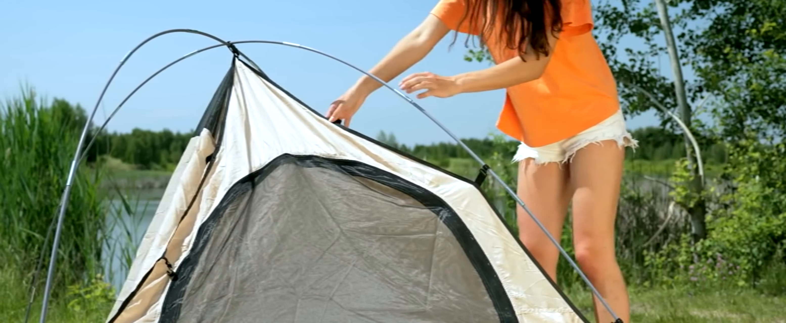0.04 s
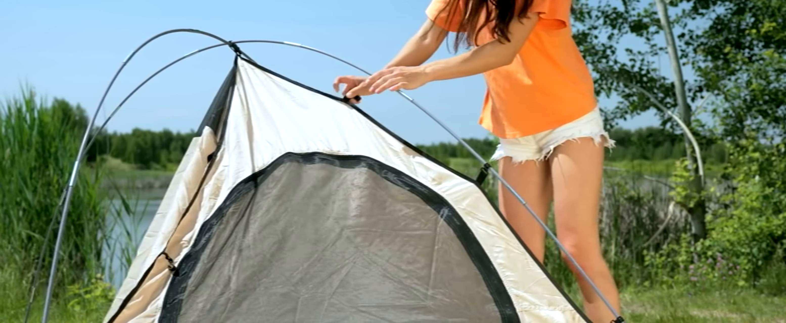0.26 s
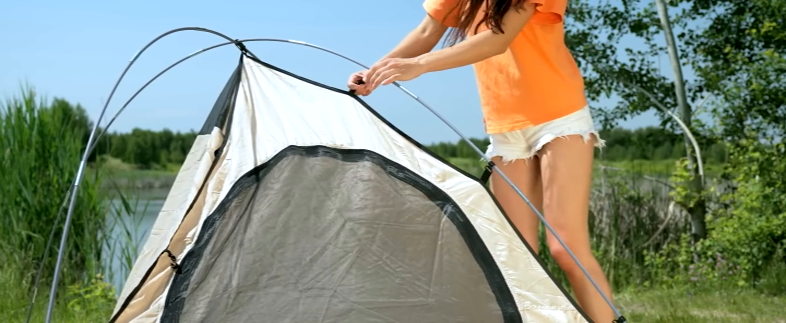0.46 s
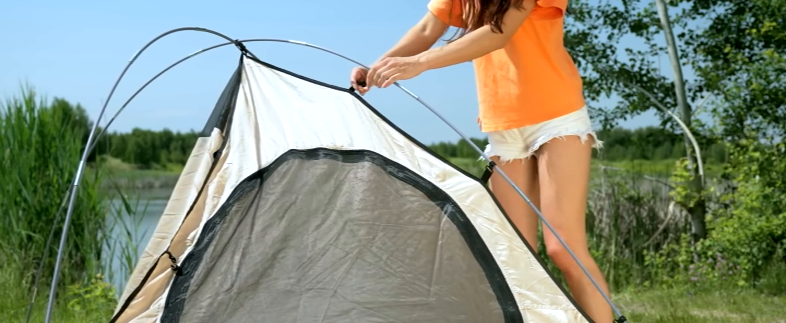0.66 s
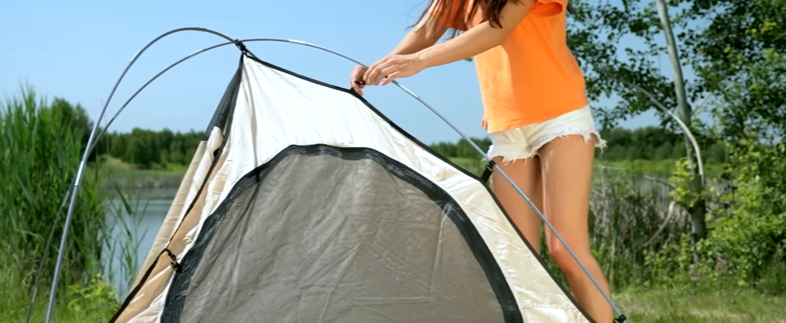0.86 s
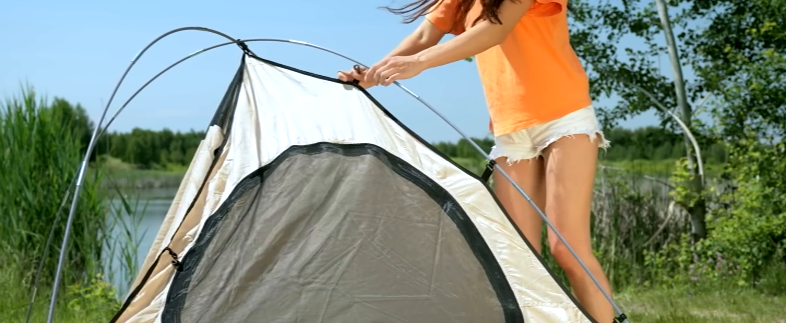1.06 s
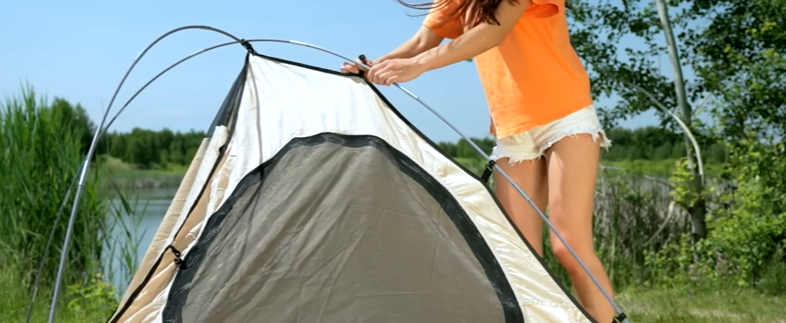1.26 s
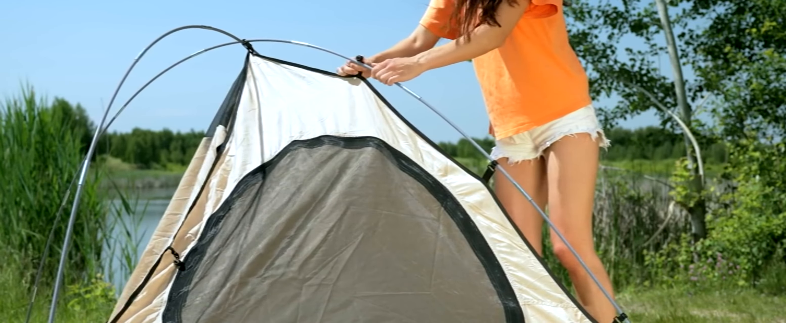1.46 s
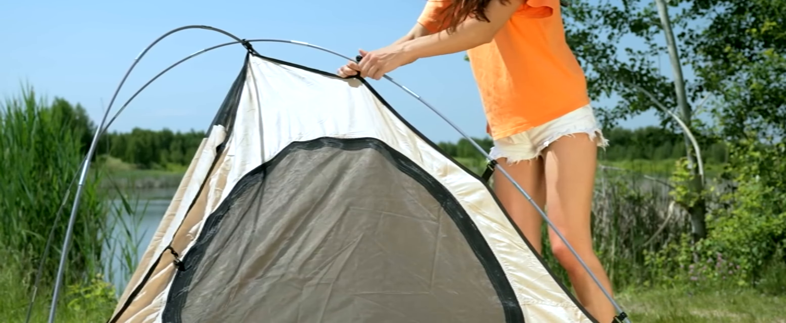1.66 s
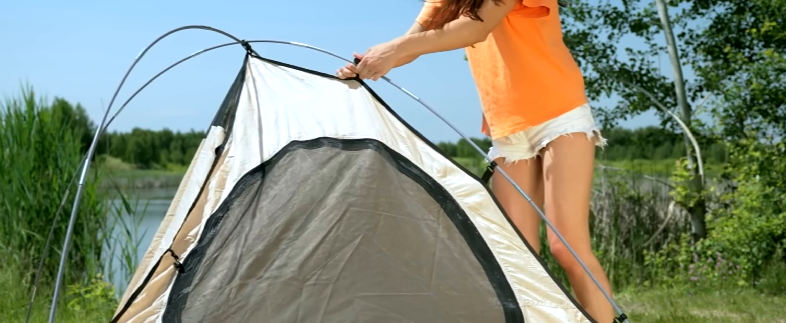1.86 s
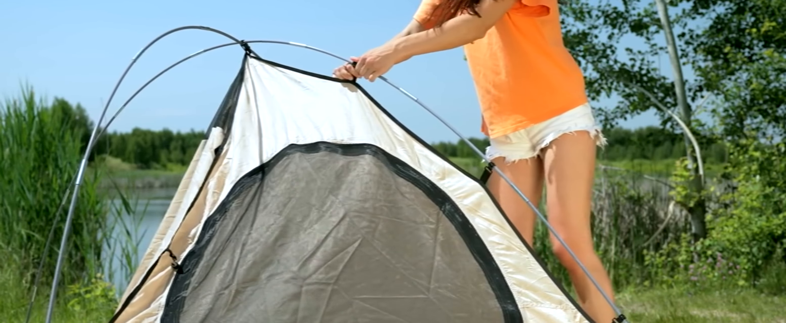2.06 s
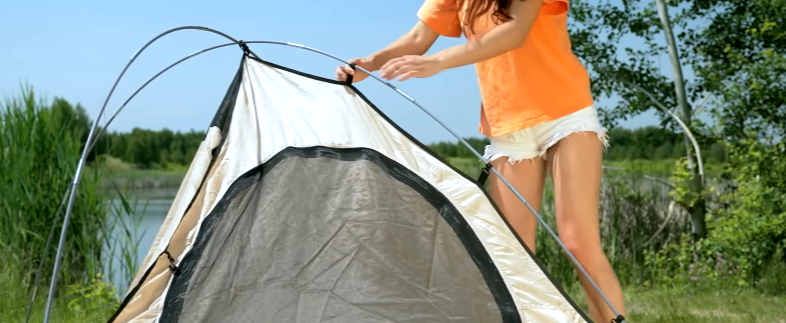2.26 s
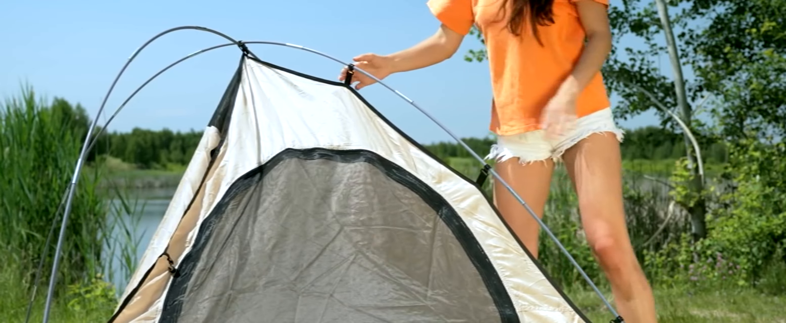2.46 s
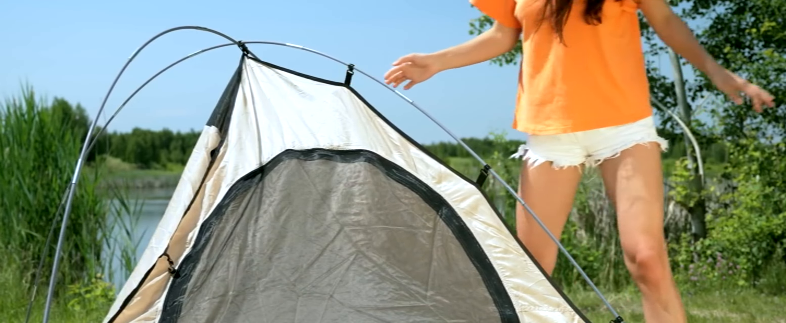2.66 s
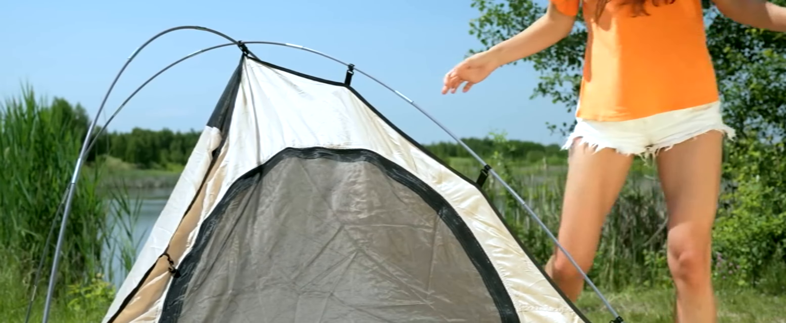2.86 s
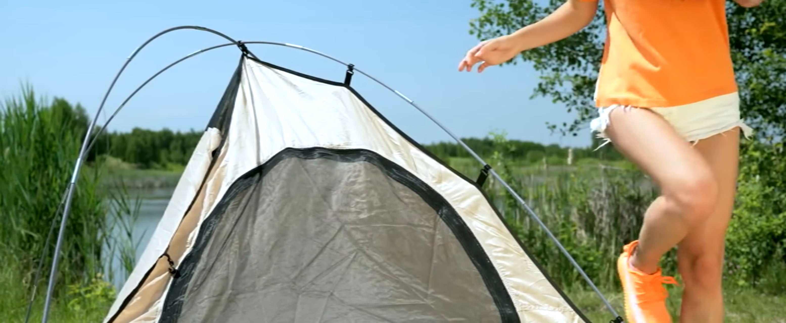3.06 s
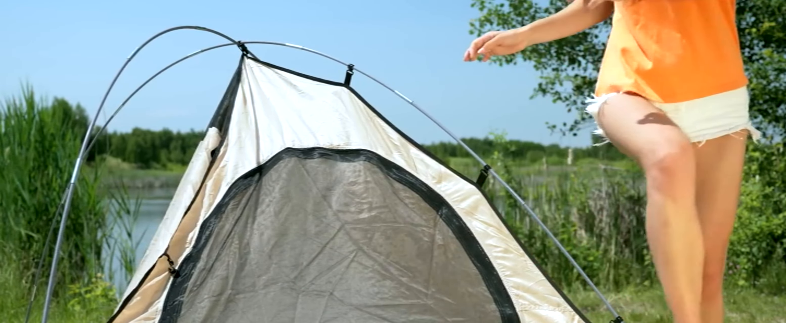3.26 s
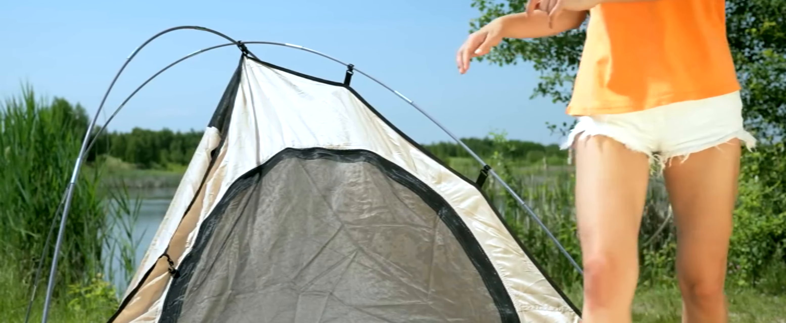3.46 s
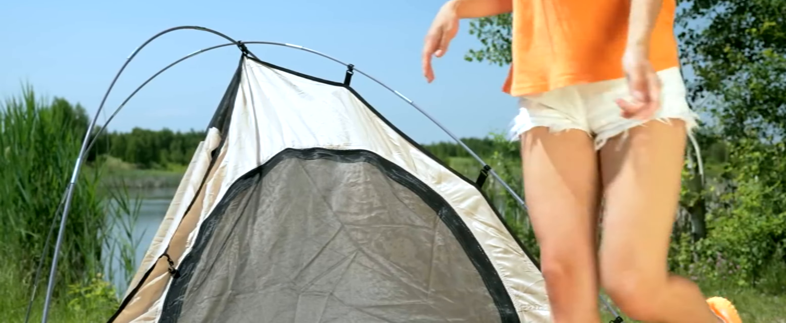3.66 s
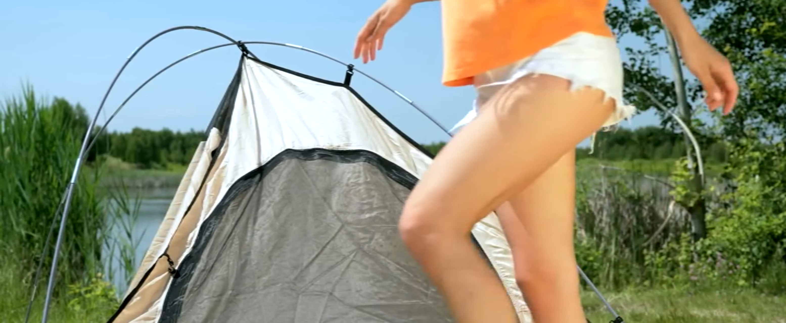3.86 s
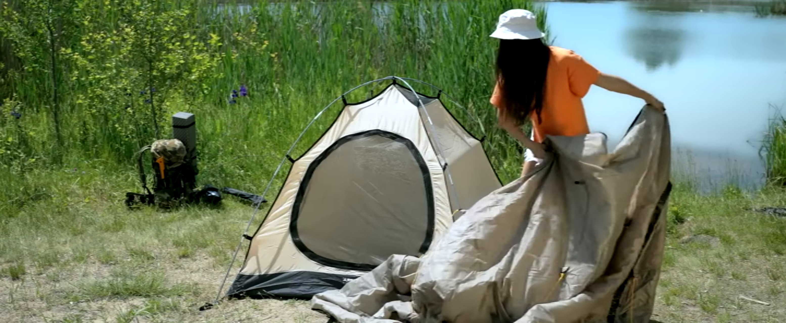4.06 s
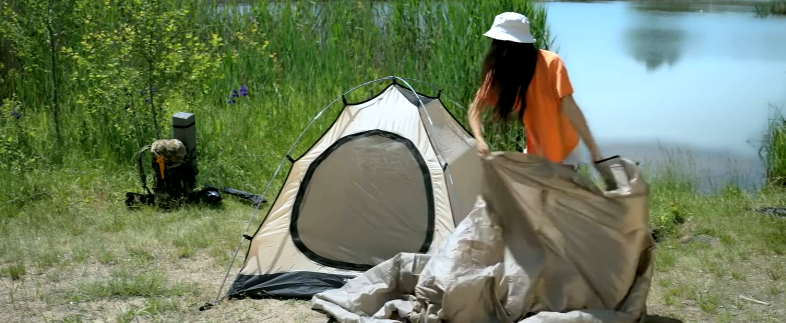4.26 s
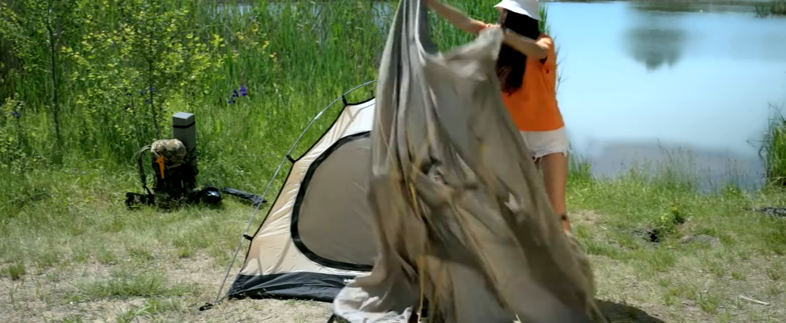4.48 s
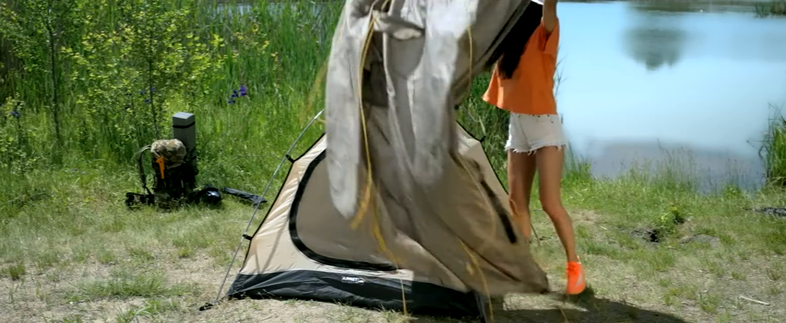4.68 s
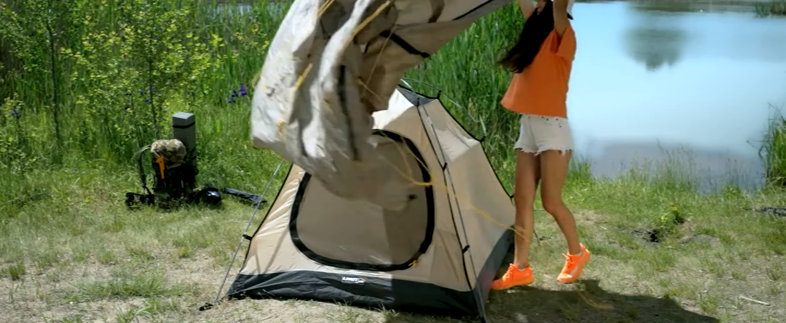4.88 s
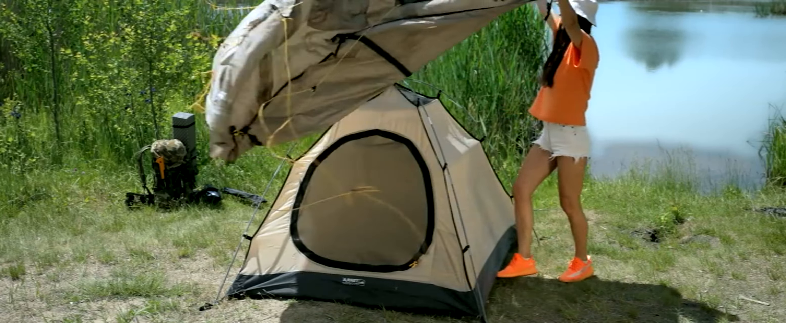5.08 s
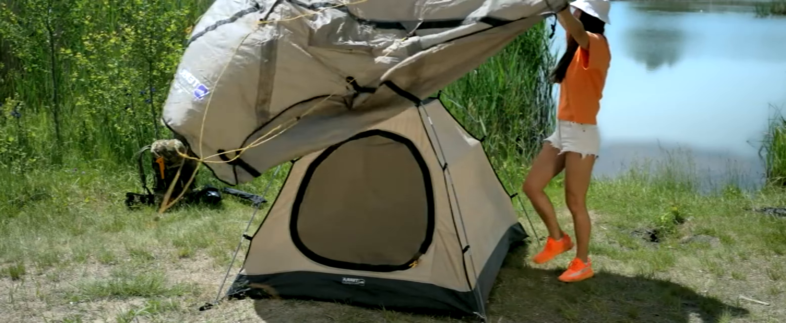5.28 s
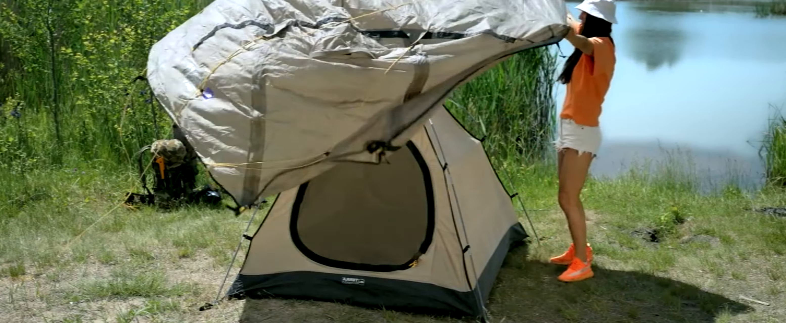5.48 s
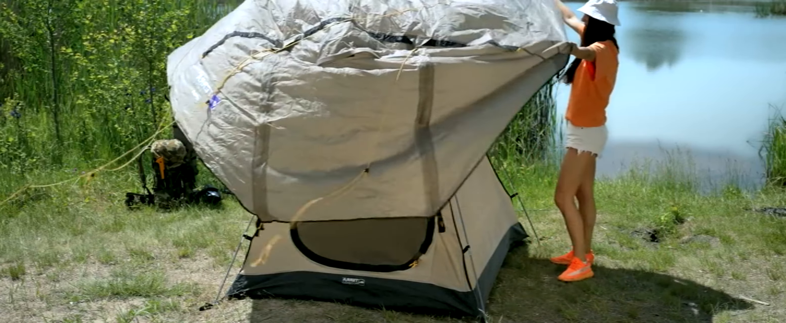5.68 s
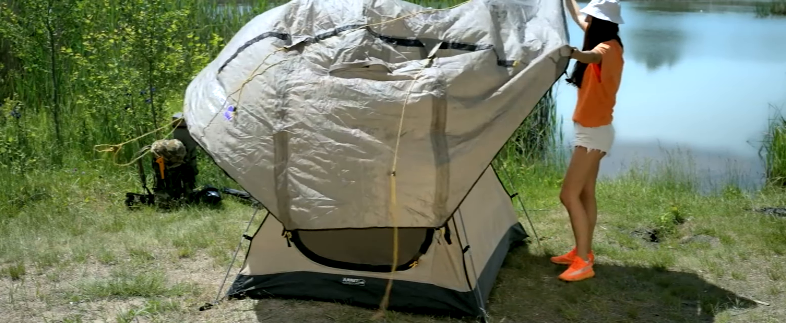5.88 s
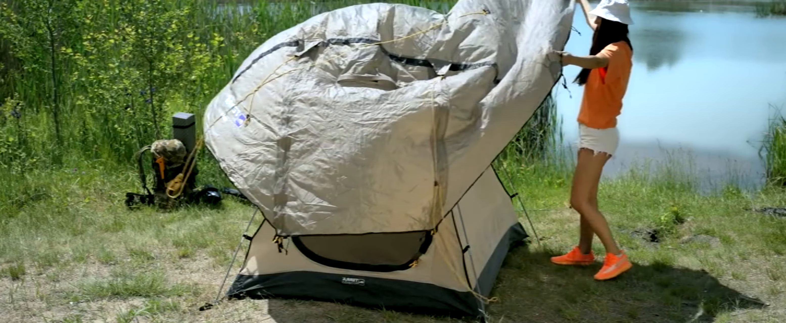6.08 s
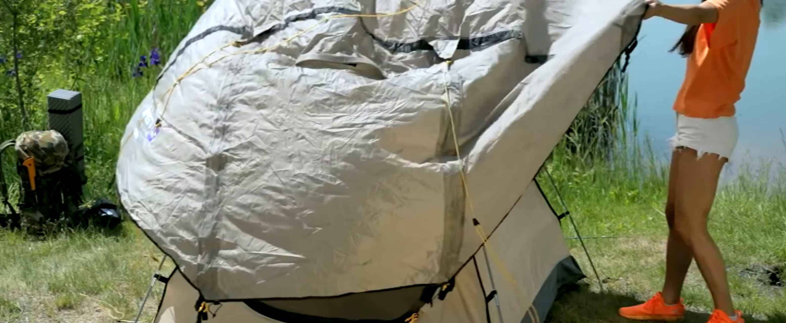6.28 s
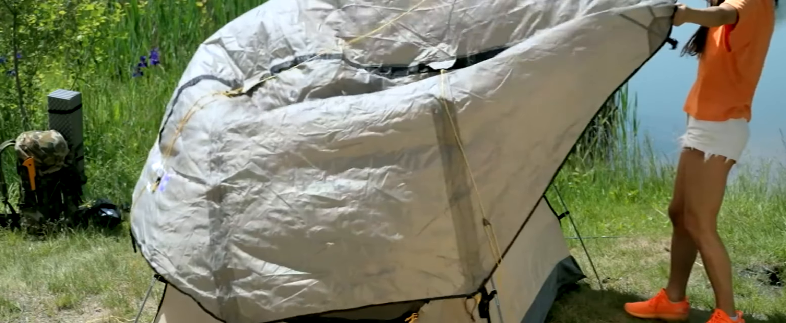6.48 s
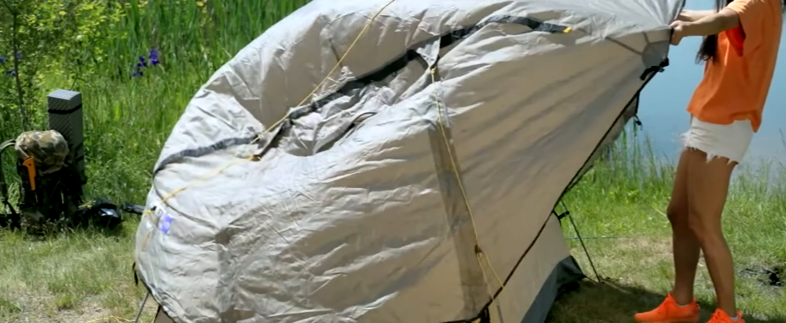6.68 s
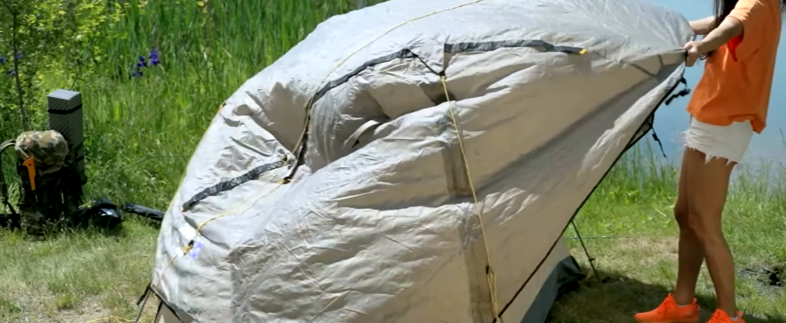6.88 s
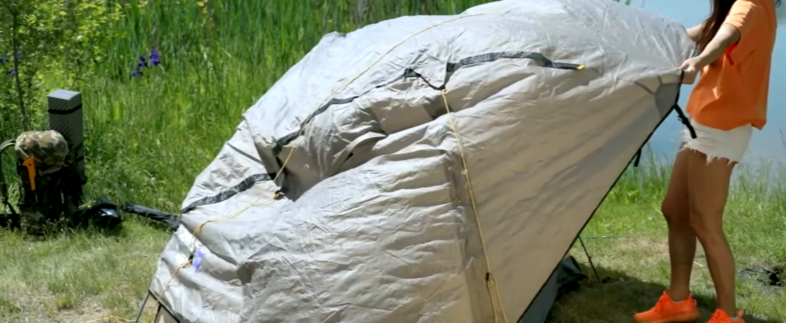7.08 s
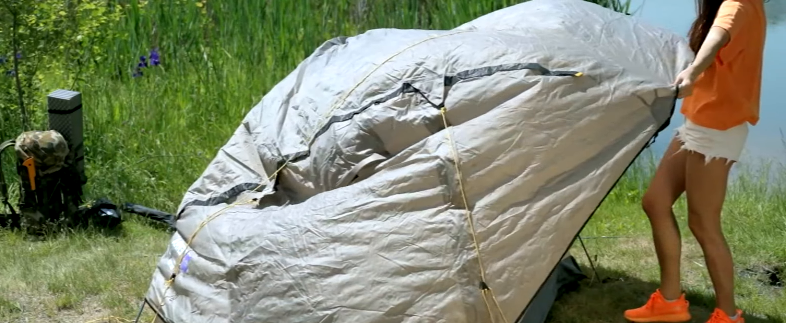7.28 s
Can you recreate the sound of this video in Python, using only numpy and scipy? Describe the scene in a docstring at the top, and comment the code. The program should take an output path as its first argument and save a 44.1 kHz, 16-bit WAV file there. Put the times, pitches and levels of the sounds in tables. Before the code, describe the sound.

A soft breeze with low rumble and faint reed hiss runs throughout, with a very faint grass brush near 0.3 s. At 1.4 s light plastic ticks sound with a short bird rasp; more rasps follow around 1.8 and 2.0 s, alongside a brighter tick and dull knock at 1.96. From 2.44 to 2.6 s the bird gives quick rasps and two falling whistles, with a faint outdoor echo. Grass swishes at 2.9 and 3.5 s, and a very loud, dry plastic snap hits at 3.68. From 4.05 s nylon rustles, swelling to a loud crackling whoosh at 4.3-4.75 with sharp creases. Duller flaps follow at 4.8-4.9, then another, softer billowing surge at 5.2-5.5. Scattered rustles and small cracks around 5.7-6.7 dwindle to breeze, with a faint tick at 7.0 s. Close, dry, open air.

```python
"""A breeze blows in the reeds throughout, and a shoe brushes grass: both are noise coloured to suit.
Plastic hooks tick on tent poles and one snaps shut (short noise bursts and fading tones), while
a marsh bird rasps (pulsed noise) and whistles (pairs of gliding tones).
A nylon fly sheet is hauled up and swung over the dome: crackling noise with flaps and cracks.
Everything is heard twice, the quieter copy a few ms late."""
import sys
import numpy as np
from scipy import signal
from scipy.fft import rfft, irfft, next_fast_len
from scipy.io import wavfile
from scipy.ndimage import uniform_filter1d

SR = 44100
rng = np.random.default_rng(int(sys.argv[2]) if len(sys.argv) > 2 else 0)


def output_pcm(signal):
    """Save a mono or channel-first signal as 16-bit PCM at the path in sys.argv[1].

    Samples are clipped to [-1, 1] before scaling.
    """
    pcm = np.clip(np.atleast_2d(signal).T, -1, 1) * 32767
    wavfile.write(sys.argv[1], SR, np.round(pcm).astype(np.int16))


N = 323253  # length in samples

# Colour of the breeze: f/Hz, relative level/dB (per Hz)
BREEZE_COLOUR = [(12, -40), (26, -14), (60, -8.5), (100, 4.5), (150, -8), (250, -11), (500, -15.5),
                 (1000, -18.5), (2500, -16), (5500, -19), (9000, -28), (15200, -34.5), (16500, -47)]
# Gusts: t/s, rumble level/dB, reed hiss level/dB (both over their usual level)
GUSTS = [(0, -1, 0.8), (.8, -1.5, 0.7), (1.1, 3, 0.9), (1.45, -0.5, 0.7), (1.85, 1.5, 0.8),
         (2.15, 0.5, 0.7), (2.5, -0.5, 0.5), (3.2, -1, -0.4), (3.7, -2.5, 0.5), (5.5, 0.5, 2),
         (6.8, -1.5, -1), (7.33, -0.5, -4)]
BREEZE_DB = -55  # level before the gusts
DEEP_SWING = 2.1  # the deepest octaves follow the rumble more widely
RUMBLE_FLICKER_DB, HISS_FLICKER_DB = 0.8, 0.9

# Grass brushed by a shoe: loudest t/s, level/dB, swell t/s, dying t/s, airy top over that level/dB
BRUSHES = [(.304, -61, .25, 0.11, -3), (2.876, -50, 0.17, .045, -4), (2.95, -54, 0.16, 0.14, -12),
           (3.527, -45.5, 0.021, 0.13, -16), (3.618, -49.5, 0.068, .05, -20)]
# Colour of the grass: f/Hz, relative level/dB (per Hz)
GRASS_COLOUR = [(300, -4.5), (1500, 3), (4000, -1), (9000, -5), (15000, -19)]
BRUSH_DEPTH_DB = 30  # a brush swells from and dies to this far under its level
AIRY_HZ = 9500  # the airy top starts here

# Hooks ticking on the poles: t/s, peak level/dB, centre f/Hz, width f/Hz, rattle's 60 dB decay t/s
TICKS = [(1.405, -29, 7600, 5000, 0.021), (1.447, -31.5, 9900, 7000, 0.0095),
         (1.9550, -30, 8500, 9000, .03), (1.9578, -21, 8140, 7100, 0.022), (1.9592, -23, 5030, 1800, 0.019),
         (2.966, -32, 3920, 4000, 0.0036), (3.6866, -45, 6200, 2000, 0.016),
         (7.002, -35, 5300, 1800, 0.042), (7.0014, -40, 9000, 9000, .01)]
# Dull knocks through taut cloth and ground, one row per tone; the rows near 1.96 s are the
# tones of one blow: t/s, peak level/dB, centre f/Hz, 60 dB decay t/s
KNOCK_TONES = [(1.9559, -25, 1146, 0.025), (1.9575, -29, 695, 0.082), (1.958, -38, 487, 0.045),
               (1.970, -39, 322, 0.04), (1.985, -36.5, 156, 0.11), (3.5190, -31.5, 235, 0.034),
               (6.736, -36.5, 205, 0.035), (6.905, -41, 985, 0.12)]
# Ringing shell of the hook that springs shut: f/Hz, relative level/dB, 60 dB decay t/s
CATCH_MODES = [(2870, -4, 0.007), (3220, -1.5, 0.0044), (1720, -12, 0.0044), (4290, -7.5, 0.0056),
               (7430, -16, 0.0044)]
# Crack of that hook (one row): peak level/dB, centre f/Hz, width f/Hz, rattle after it level/dB
CATCH_CRACK = (-1, 8500, 10000, -20.5)
CATCH_S, CATCH_DB = 3.6767, -2.5  # start and peak of the shell's ring
PUSH_S, CRACK_LAG_S = 0.0008, 0.001  # the ring's soft start, and the wait before the crack

# Bird rasps; the weak short rows about 45 ms after a long rasp are its echo:
# t/s, length t/s, peak level/dB, centre f/Hz, width f/Hz
RASPS = [(1.438, 0.032, -32.5, 2670, 1240), (1.481, .012, -44, 2490, 700), (1.833, .034, -34, 2530, 1150),
         (1.878, 0.012, -39, 2420, 700), (2.001, 0.0039, -36, 2420, 700),
         (2.0074, 0.029, -27.5, 2660, 1220), (2.05, 0.0058, -39, 2600, 900), (2.443, .005, -36, 3330, 500),
         (2.453, 0.0095, -24.5, 3660, 1280), (2.454, 0.0074, -37, 2120, 800),
         (2.504, 0.0059, -27.5, 3380, 1790), (2.505, .0067, -42, 2000, 800), (2.535, .0069, -34, 3240, 500),
         (2.545, 0.01, -24.5, 3680, 1200), (2.547, .0092, -42, 2170, 700), (2.597, 0.0071, -33, 3000, 500)]
# Bird whistles, one list per note: t/s, upper partial f/Hz, its level/dB, lower partial level/dB
WHISTLES = [
    [(2.468, 3590, -42, -54), (2.482, 3405, -33.5, -53), (2.498, 3290, -31, -53), (2.508, 3280, -31, -48)],
    [(2.562, 3530, -39, -55), (2.584, 3336, -32, -52), (2.598, 3120, -36, -52), (2.608, 3000, -56, -65)],
]
# Scattered echo from far bank and trees (one row): lag t/s, 60 dB decay t/s, level/dB
BIRD_ECHO = (.02, .9, -17)
RASP_PULSES_HZ = 192

# Swing of the fly sheet: t/s, rustle level/dB, treble over the rustle level/dB
SHEET_SWING = [(4.05, -81, -4), (4.09, -45, -5), (4.2, -47, -8), (4.28, -43.5, -10), (4.33, -35.5, -10.5),
               (4.39, -30, -9.5), (4.45, -30, -6), (4.5, -26.5, -8), (4.6, -29, -6), (4.73, -30, -9.5),
               (4.755, -40.5, -4.5), (4.8, -44, -4), (4.89, -40, -9), (4.92, -45.5, -9), (5.07, -49.5, -1),
               (5.15, -44.5, -6), (5.2, -45.5, -10), (5.25, -42, -15), (5.3, -43.5, -9.5),
               (5.34, -37, -7.5), (5.44, -36, -8), (5.5, -41.5, -4.5), (5.55, -43, -3.5), (5.58, -46.5, -9),
               (5.71, -53.5, -5), (5.75, -45, -11.5), (6.02, -53, -5.5), (6.18, -47.5, -7), (6.34, -51, -7),
               (6.44, -50, -5), (6.48, -45, -10.5), (6.52, -50, -5.5), (6.58, -50.5, -6.5),
               (6.7, -55.5, -2.5), (6.84, -49.5, -5), (6.93, -53, -5), (7.03, -61, -1.5), (7.33, -63, -2)]
# Colour of the nylon: f/Hz, relative level/dB (per Hz)
NYLON_COLOUR = [(29, -56), (50, 2), (135, -0.5), (258, -4.5), (321, -3.5), (408, -4), (532, -9),
                (586, -9.5), (822, -10.5), (3250, -16.5), (13800, -41.5), (16000, -42)]
# Folds flapping taut: t/s, peak level/dB, centre f/Hz
FLAPS = [(4.087, -31.5, 875), (4.141, -27, 820), (4.174, -31, 676), (4.222, -31, 820), (4.245, -31, 684),
         (4.337, -15.5, 1230), (4.812, -30, 830), (4.837, -19, 493), (4.879, -19, 487), (4.952, -35, 326),
         (5.104, -30.5, 486), (5.144, -31, 288), (5.21, -28.5, 292), (5.234, -25, 316), (5.249, -28.5, 320),
         (5.276, -33, 328), (5.323, -25, 824), (5.375, -32, 348), (5.405, -30, 324), (5.431, -23, 372),
         (5.652, -37, 510), (5.728, -27.5, 1170), (6.131, -50, 350), (6.243, -37, 320), (6.407, -38, 840),
         (6.454, -34, 497), (6.532, -31, 845), (6.738, -34, 290), (7.231, -42.5, 316)]
# Creases cracking: t/s, peak level/dB, centre f/Hz
CRACKS = [(4.0906, -36, 2860), (4.2233, -37, 2200), (4.2941, -24, 3010), (4.3161, -27, 2870),
          (4.3385, -13, 4320), (4.3756, -17, 3180), (4.4292, -18, 3010), (4.4816, -9.5, 3330),
          (4.4938, -15, 2520), (4.6965, -13, 3300), (4.7182, -9, 3900), (4.7324, -14, 3330),
          (4.7564, -33, 3020), (4.8352, -23, 4300), (4.8794, -32, 2660), (5.148, -32, 2670),
          (5.2345, -24, 1500), (5.3238, -28, 3350), (5.4181, -30, 3670), (5.445, -20, 2840),
          (5.4844, -29, 3130), (5.7274, -38, 2640), (5.7966, -28, 2860), (6.1844, -36, 2690),
          (6.4712, -24, 2200), (6.4905, -21, 1900), (6.539, -28, 3850), (6.7385, -28, 4500)]
# Edges of the cloth's four ranges, low to high: f/Hz
RANGE_EDGES = [85, 420, 2500, 6000, 20000]
FRONT = 12.0  # first sample of a flap's or crack's noise, where the rest has a spread of 1
BILLOW_DB, FULL_SWING_DB = -0.5, -28  # billow over the rustle when the rustle is at full swing
BILLOW_PER_DB = 0.25  # extra sinking of the billow for each dB the rustle sinks
FLUTTER_DB = 1.54  # each range of the cloth flickers on its own
CRACKLE_DB = -3  # crackle against the sheen
FLAP_T60_S, CRACK_T60_S = 0.028, 0.017  # 60 dB decay times
SHAKE_DB, SHAKE_T60_S = -13.5, 0.038  # burst of rustle shaken out by a flap: level under its peak

COPY_S, COPY_GAIN = 0.005997, 0.58  # delay and strength of the late copy
TOP_HZ, OFFSET = 15850, -0.0028  # treble cut, and shift of the zero line


def undb(db):
    """Gain of a level in dB."""
    return 10 ** (np.asarray(db) / 20)


def unit(x):
    """Scales x to an rms of 1."""
    return x / np.sqrt(np.mean(x ** 2))


def colour(x, table):
    """Shapes x by (Hz, dB) points joined on a log-frequency axis."""
    size = next_fast_len(N)
    hz, db = np.transpose(table)
    f = np.maximum(np.arange(size // 2 + 1) * SR / size, 1)
    gain = undb(np.interp(np.log(f), np.log(hz), db))
    return irfft(rfft(x, size) * gain, size)[:N]


def band(x, lo_hz, hi_hz, order=2):
    """Keeps the pitches between two edges."""
    edges = [max(lo_hz, 5), min(hi_hz, 0.45 * SR)]
    return signal.sosfilt(signal.butter(order, edges, "bandpass", fs=SR, output="sos"), x)


def gate(rows, column):
    """Gain along a curve of dB points, fading to near silence outside its rows."""
    rows = np.array(rows)
    s = np.concatenate([[rows[0, 0] - 0.01], rows[:, 0], [rows[-1, 0] + 0.0075]])
    db = np.concatenate([[-90], rows[:, column], [-90]])
    return undb(np.interp(np.arange(N) / SR, s, db))


def walk(rate):
    """Random levels, `rate` new ones a second, smoothed twice; spread near 1."""
    k = int(SR / rate)
    steps = np.repeat(rng.standard_normal(N // k + 1), k)
    return 1.16 * uniform_filter1d(uniform_filter1d(steps, k), k)[:N]


def grains(rate, spread_db, tail_s, bed):
    """Random pops, a few far louder, each with a short noisy tail, over a smooth bed of noise."""
    sizes = np.minimum(rng.exponential(size=N), 3.5)
    pops = (rng.random(N) < rate / SR) * undb(spread_db * sizes)
    smear = signal.lfilter([1], [1, -np.exp(-1 / (tail_s * SR))], pops ** 2)
    return unit(rng.standard_normal(N) * np.sqrt(bed + smear / smear.mean()))


def add(out, s, x, db):
    """Mixes x in at time s with its peak at db."""
    i = int(round(s * SR))
    x = x[:N - i]
    out[i:i + len(x)] += x * undb(db) / np.abs(x).max()


def fade(t60, length_s=0.25):
    """Time axis and an exponential decay that falls 60 dB in t60 seconds."""
    t = np.arange(int(length_s * SR)) / SR
    return t, np.exp(-np.log(1000) * t / max(t60, 0.001))


def slices(x):
    """Cuts x into billow, rustle, crackle and sheen ranges that overlap without a dip, each at rms 1."""
    size = next_fast_len(N)
    f = np.arange(size // 2 + 1) * SR / size
    spectrum = rfft(x, size)
    below = [1 / (1 + (f / hz) ** 4) for hz in RANGE_EDGES]
    return [unit(irfft(spectrum * (hi - lo), size)[:N]) for lo, hi in zip(below, below[1:])]


def breeze():
    """Octave bands of wind in the reeds: bass follows the rumble, treble the hiss, each flickering alone."""
    air = unit(colour(rng.standard_normal(N), BREEZE_COLOUR)) * undb(BREEZE_DB)
    s, *columns = np.transpose(GUSTS)
    rumble_db, hiss_db = (np.interp(np.arange(N) / SR, s, c) for c in columns)
    out = np.zeros(N)
    for hz in 10 * 2.0 ** np.arange(11):
        if hz < 200:
            swing = DEEP_SWING if hz < 80 else 1
            gust_db = rumble_db * swing + RUMBLE_FLICKER_DB * walk(4.4)
        else:
            gust_db = hiss_db + HISS_FLICKER_DB * walk(8.7)
        out += undb(gust_db) * band(air, hz, 2 * hz, order=1)
    return out


def shoe():
    """Blades of grass crackle as each brush swells and dies, with an airy hiss on top."""
    crackling = grains(rate=1500.0, spread_db=4.5, tail_s=0.00065, bed=0.46)
    blades = unit(colour(crackling, GRASS_COLOUR))
    airy = unit(band(rng.standard_normal(N), AIRY_HZ, 20000))
    out = np.zeros(N)
    for s, db, swell_s, dying_s, top_db in BRUSHES:
        low_db = db - BRUSH_DEPTH_DB
        stroke = gate([(s - swell_s, low_db), (s, db), (s + dying_s, low_db)], 1)
        out += stroke * (blades + undb(top_db) * airy)
    return out


def ticks(out):
    """A hook tapping a pole: a fading burst of noise kept to a bright band."""
    for s, db, hz, width_hz, t60 in TICKS:
        t, env = fade(t60, 0.06)
        rattle = env * rng.standard_normal(len(t))
        add(out, s, band(rattle, hz - width_hz / 2, hz + width_hz / 2), db)


def knocks(out):
    """Dull blows through taut cloth and ground: each tone and the noise around it die away together."""
    for s, db, hz, t60 in KNOCK_TONES:
        t, env = fade(t60)
        thud = band(rng.standard_normal(len(t)), hz / 1.6, hz * 1.6)
        add(out, s, env * (np.sin(2 * np.pi * hz * t) + 4 * thud), db)


def catch(out):
    """A hook springs shut: its shell starts to ring as a few fading tones, then it cracks and rattles."""
    t = fade(1, 0.03)[0]
    shell = np.zeros(len(t))
    for hz, db, t60 in CATCH_MODES:
        shell += undb(db) * fade(t60, 0.03)[1] * np.sin(2 * np.pi * hz * t)
    push = 1 - np.exp(-(t / PUSH_S) ** 2)
    add(out, CATCH_S, -shell * push, CATCH_DB)
    db, hz, width_hz, rattle_db = CATCH_CRACK
    env = fade(0.0025, 0.03)[1] + undb(rattle_db) * fade(0.03, 0.03)[1]
    crack = env * rng.standard_normal(len(t))
    crack[0] = 3  # sharp front
    add(out, CATCH_S + CRACK_LAG_S, band(crack, hz - width_hz / 2, hz + width_hz / 2), db)


def hooks():
    """Plastic hooks on the poles: bright ticks, dull knocks and one loud catch."""
    out = np.zeros(N)
    ticks(out)
    knocks(out)
    catch(out)
    return out


def rasps(out):
    """Pulses of breath ring the throat: noise beating at a steady rate; weak short rows repeat it as echo."""
    for s, length_s, db, hz, width_hz in RASPS:
        t = np.arange(int(length_s * SR)) / SR
        beat = (1 - np.cos(2 * np.pi * RASP_PULSES_HZ * t)) / 2
        swell = np.sqrt(np.sin(np.pi * t / length_s))
        breath = (0.88 + beat) * rng.standard_normal(len(t)) * swell
        breath = np.pad(breath, (0, 200))  # room for the ringing to end
        add(out, s, band(breath, hz - width_hz / 2, hz + width_hz / 2, order=4), db)


def whistles(out):
    """Each whistle is two gliding pure tones an octave apart."""
    for note in WHISTLES:
        s, hz = np.transpose(note)[:2]
        phase = 2 * np.pi * np.cumsum(np.interp(np.arange(N) / SR, s, hz)) / SR
        tones = gate(note, 2) * np.sin(phase) + gate(note, 3) * np.sin(phase / 2)
        out += np.sqrt(2) * tones  # the levels are rms


def bird():
    """Rasps and whistles, answered by a scattered, fading echo from the far bank and trees."""
    out = np.zeros(N)
    rasps(out)
    whistles(out)
    lag_s, t60, db = BIRD_ECHO
    t, env = fade(t60, 0.5)
    scatter = env * (t > lag_s) * rng.standard_normal(len(t))
    scatter /= np.linalg.norm(scatter)
    return out + undb(db) * signal.fftconvolve(out, scatter)[:N]


def flaps(rustle, billow):
    """A fold pulled taut slaps as a fading tone with noise, and shakes a burst of rustle out of the cloth."""
    out, shake = np.zeros(N), np.zeros(N)
    for s, db, hz in FLAPS:
        t, env = fade(FLAP_T60_S, 0.05)
        jolt = rng.standard_normal(len(t))
        jolt[0] = FRONT
        slap = np.sin(2 * np.pi * hz * t) + 1.1 * band(jolt, hz / 1.05, hz * 4)
        add(out, s, env * slap, db)
        add(shake, s, fade(SHAKE_T60_S)[1], db + SHAKE_DB)
    return out + shake * (rustle + 0.46 * billow)


def cracks():
    """A crease snaps: a sharp front and a short noisy tail around one pitch."""
    out = np.zeros(N)
    for s, db, hz in CRACKS:
        t, env = fade(CRACK_T60_S, 0.03)
        burst = env * rng.standard_normal(len(t))
        burst[0] = FRONT
        add(out, s, band(burst, hz / 1.6, hz * 1.6, order=1), db)
    return out


def sheet():
    """Creases crackle through the colour of nylon; big folds billow below, flap when pulled taut and crack."""
    creases = colour(grains(rate=1300.0, spread_db=3.5, tail_s=0.0014, bed=0.26), NYLON_COLOUR)
    dry_pops = grains(rate=250.0, spread_db=5.5, tail_s=0.00008, bed=0)
    creases += colour(dry_pops * undb(-8.5), NYLON_COLOUR)
    folds = colour(grains(rate=170.0, spread_db=3.5, tail_s=0.0034, bed=1.0), NYLON_COLOUR)
    billow = slices(folds)[0]
    rustle, crackle, sheen = slices(creases + 0.71 * folds)[1:]
    ranges = (billow, rustle, crackle, sheen)
    billow, rustle, crackle, sheen = (undb(FLUTTER_DB * walk(25)) * x for x in ranges)

    swing = gate(SHEET_SWING, 1)
    heave = undb(BILLOW_DB) * (swing / undb(FULL_SWING_DB)) ** BILLOW_PER_DB
    treble = gate(SHEET_SWING, 2) * (undb(CRACKLE_DB) * crackle + sheen)
    out = swing * (rustle + heave * billow + treble)
    out += flaps(rustle, billow) + cracks()
    return band(out, 65, 21000, order=2)  # thin cloth moves little air at the lowest pitches


def scene():
    """All sources at one microphone."""
    return (breeze() + shoe() + hooks() + bird() + sheet())[None]


def record(dry):
    """A quieter late copy combs the spectrum; the top is cut and the zero line sits low."""
    size = next_fast_len(N + SR // 10)
    f = np.arange(size // 2 + 1) * SR / size
    late_copy = COPY_GAIN * np.exp(-2j * np.pi * f * COPY_S)
    comb = (1 + late_copy) / np.sqrt(1 + COPY_GAIN ** 2)
    doubled = irfft(rfft(dry, size) * comb, size)[:, :N]
    top_cut = signal.ellip(10, 0.2, 70, TOP_HZ, fs=SR, output="sos")
    return signal.sosfilt(top_cut, doubled) + OFFSET


dry = scene()
out = record(dry)
output_pcm(out)
```